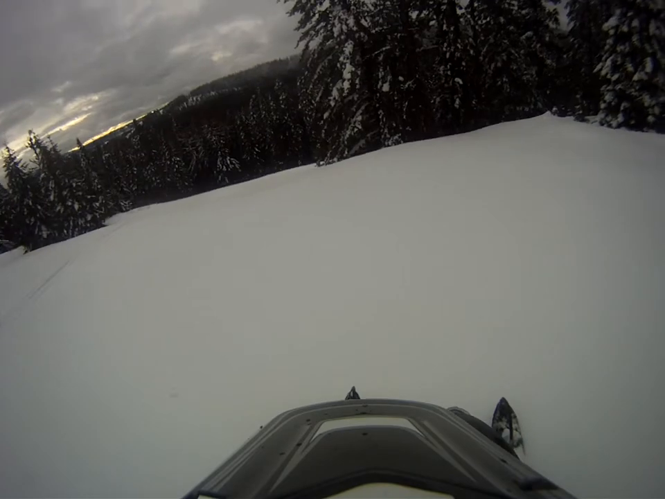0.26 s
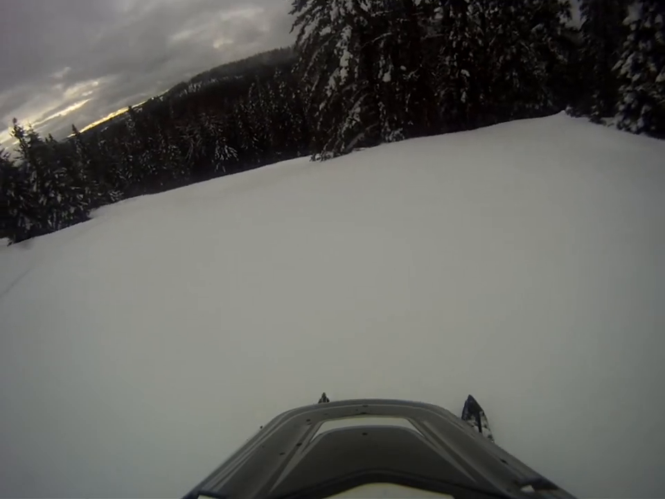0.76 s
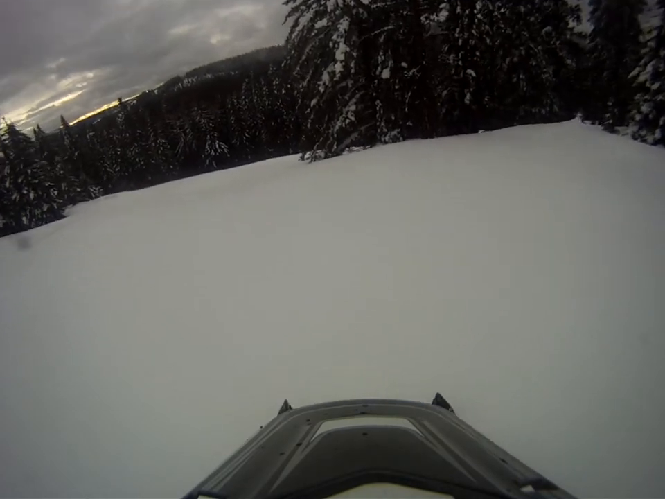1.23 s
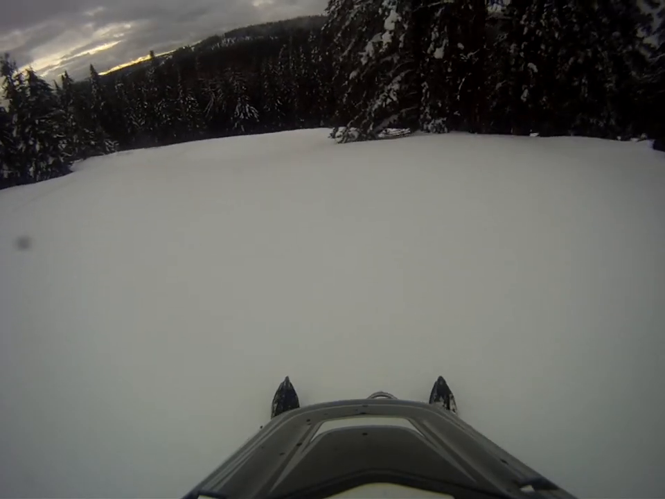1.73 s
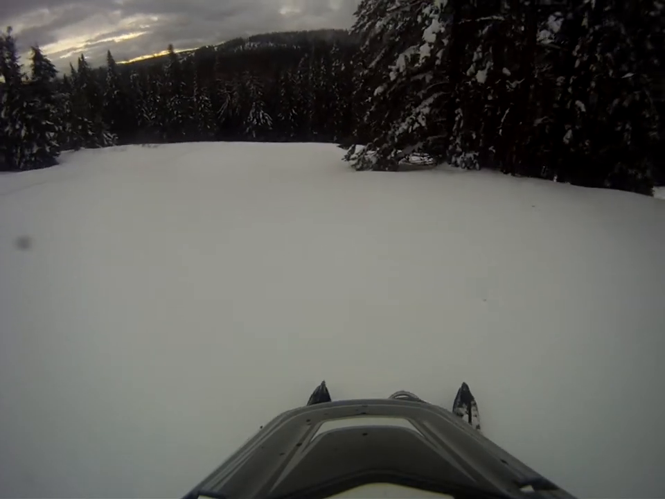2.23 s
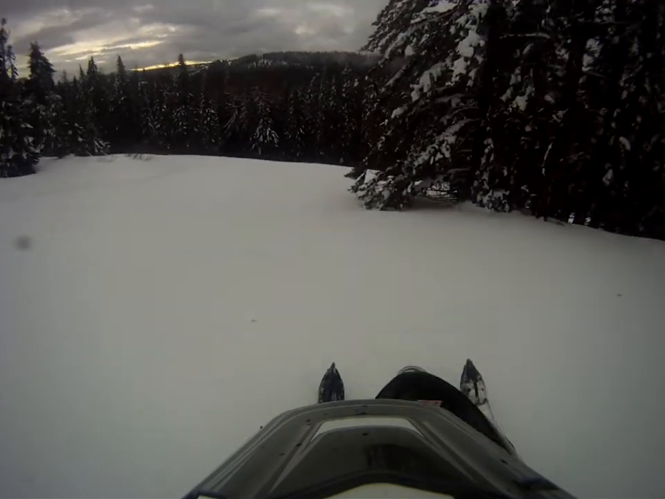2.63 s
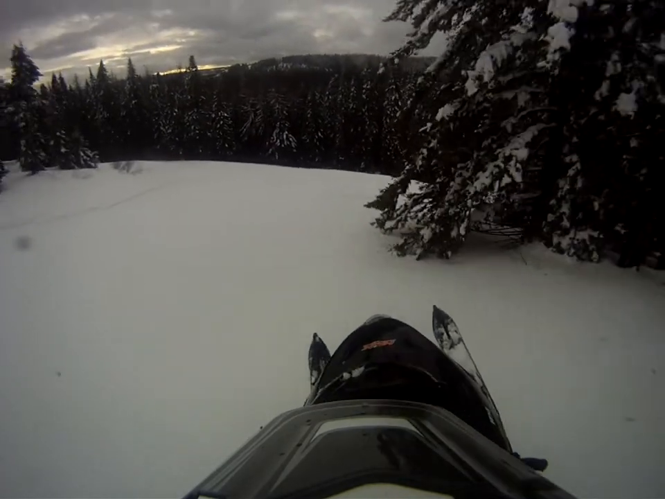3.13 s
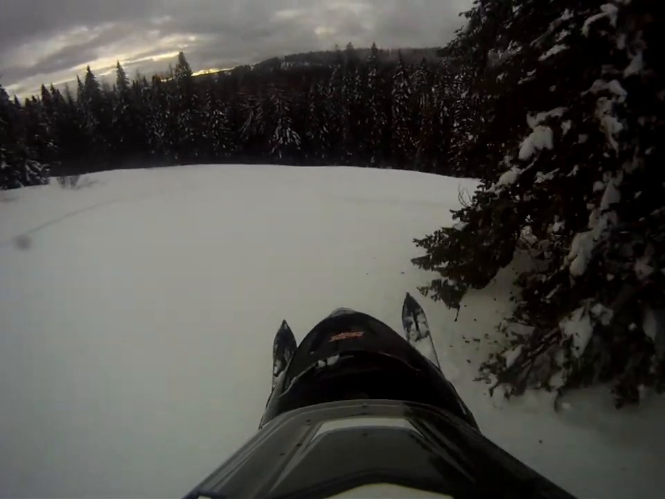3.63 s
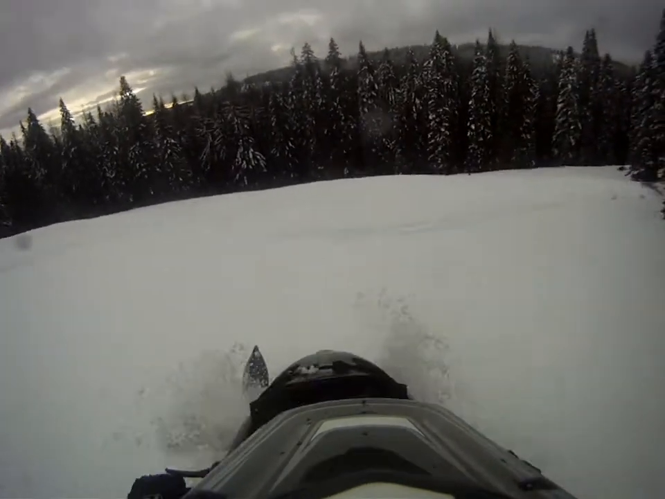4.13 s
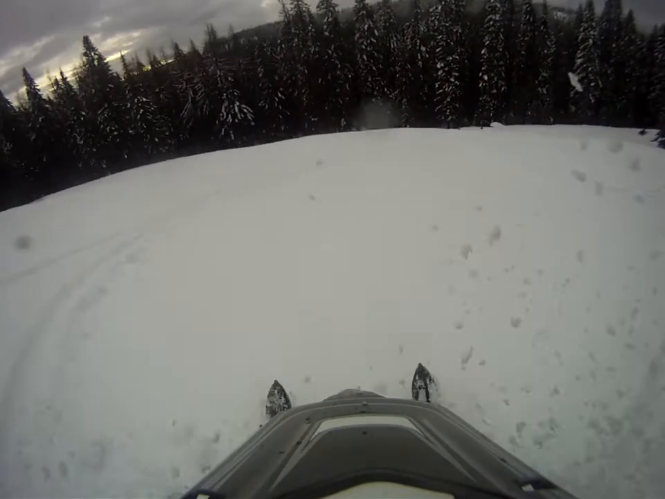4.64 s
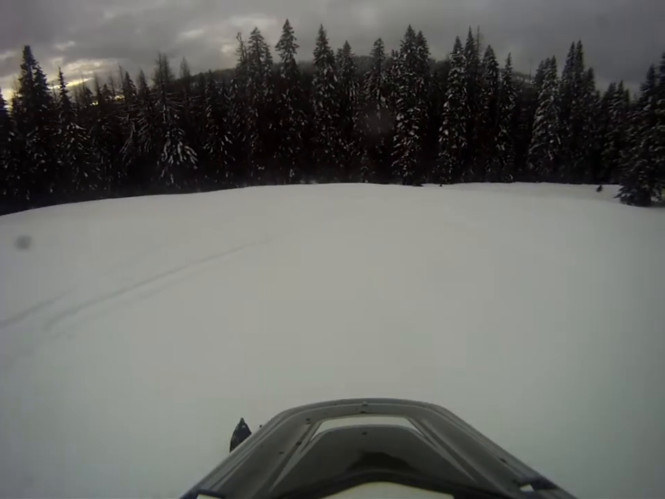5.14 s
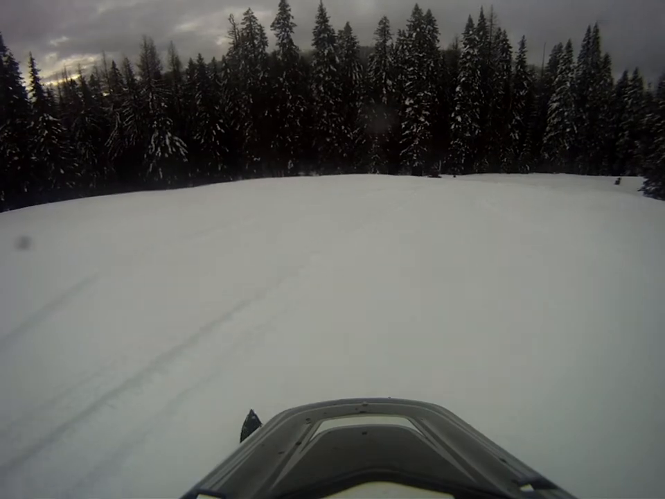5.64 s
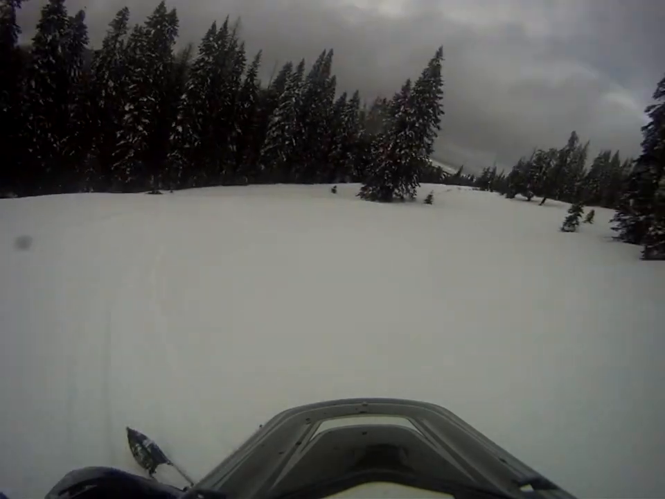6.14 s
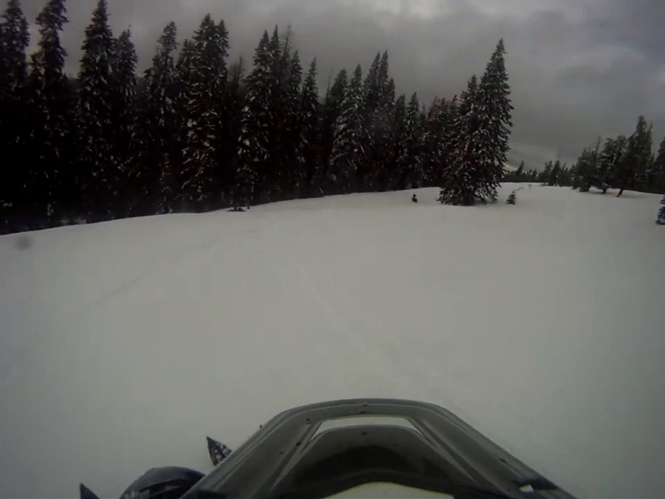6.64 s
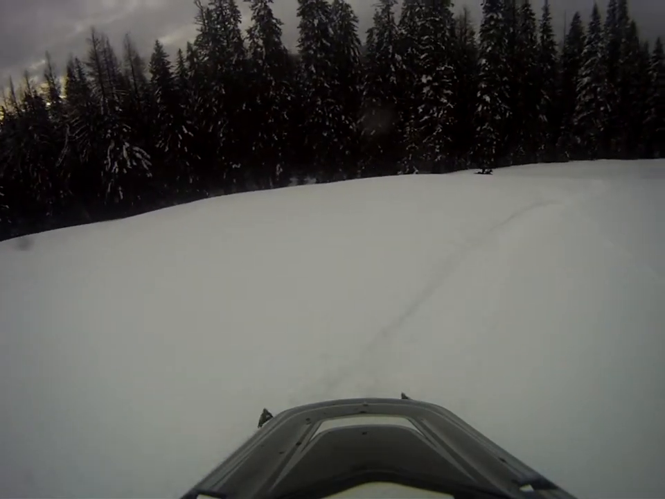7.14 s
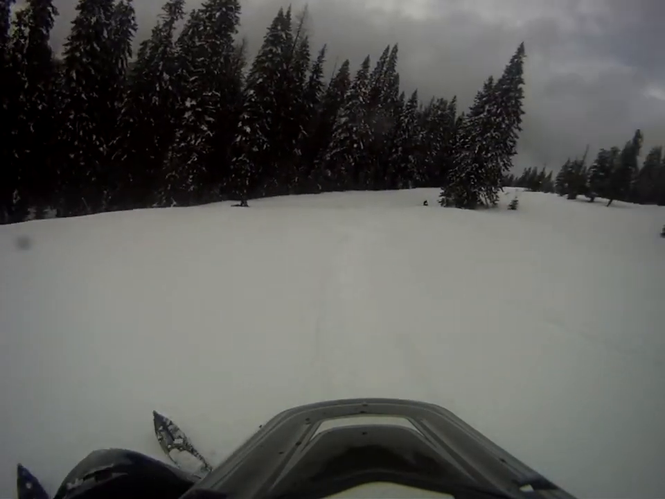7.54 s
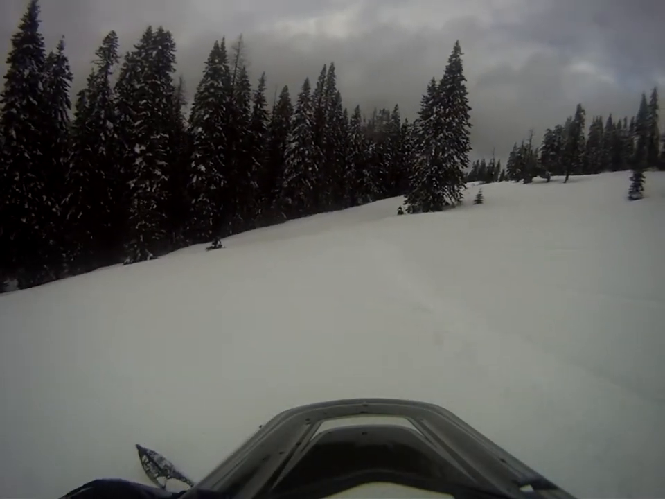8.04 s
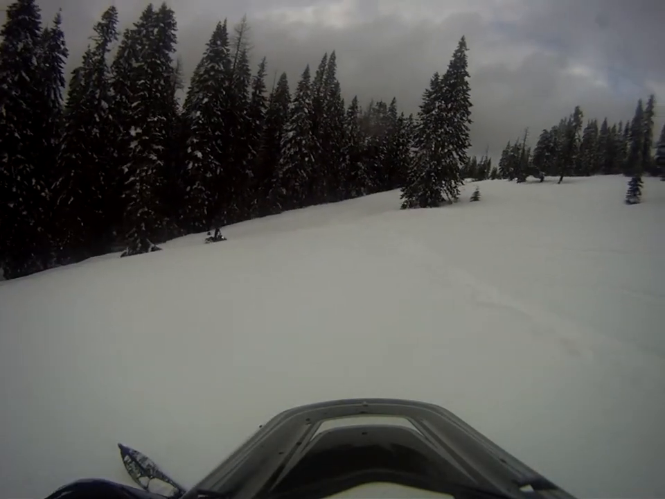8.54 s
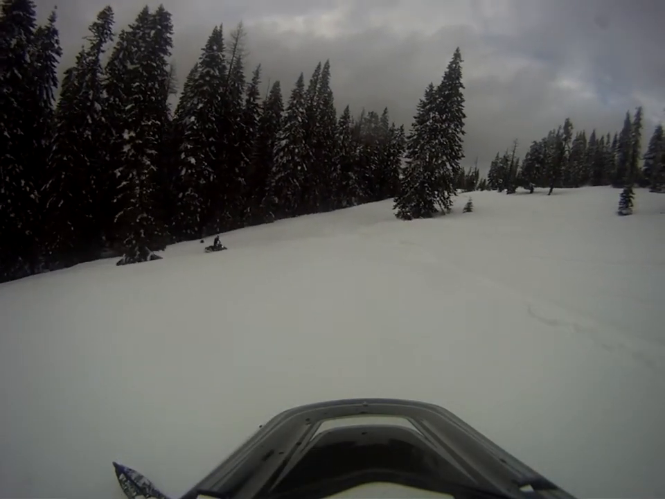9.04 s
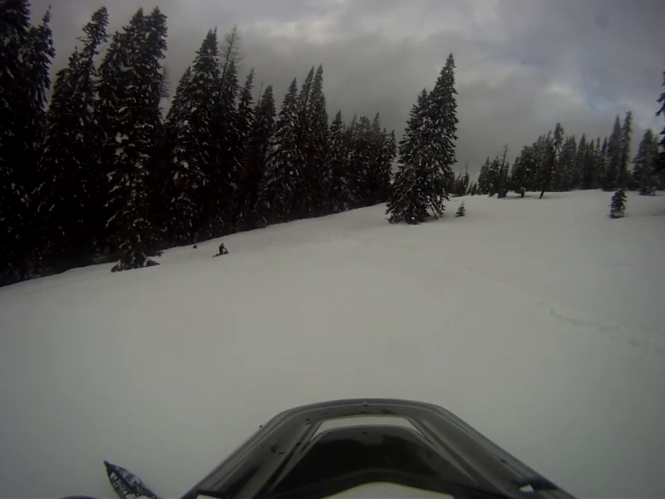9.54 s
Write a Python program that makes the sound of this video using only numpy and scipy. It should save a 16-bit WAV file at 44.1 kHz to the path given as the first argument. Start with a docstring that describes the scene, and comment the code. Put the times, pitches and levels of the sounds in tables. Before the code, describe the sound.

Outdoors in deep snow, a snowmobile engine gives two short revs, then rises to a high howl over track noise and hissing spray. As it backs off, a very loud, sharp knock hits the rider's enclosed microphone, followed by small ticks of snow and a second crack. The revs sink to an uneven, clattering idle, and another snowmobile buzzes thinly far away. The close sound is boxy and slightly gritty.

```python
"""A two-stroke twin snowmobile, heard from a camera in a closed case worn by the rider.
It blips, pulls up to full throttle through deep snow, then coasts down to a loping idle.
Firings sound the pipe and rattle the cowling; track lugs drum, powder hisses, a far sled revs.
Snow clods tick on the case and bumps set the mount humming; one hard knock overloads the
microphone and ducks its gain."""
import sys
import numpy as np
from scipy import signal
from scipy.fft import rfft, irfft, next_fast_len
from scipy.io import wavfile
from scipy.ndimage import uniform_filter1d

SR = 44100
rng = np.random.default_rng(int(sys.argv[2]) if len(sys.argv) > 2 else 0)


def waveform_to_disk(signal):
    """Save audio, clipped to [-1, 1], as 16-bit WAV at the path in sys.argv[1]."""
    frames = np.transpose(np.atleast_2d(signal))
    scaled = np.clip(frames, -1, 1) * 32767
    samples = np.round(scaled).astype(np.int16)
    wavfile.write(sys.argv[1], SR, samples)


N = 431298


def from_db(db):
    """Decibels to gain."""
    return 10 ** (np.asarray(db) / 20)


def unit_rms(x):
    """Scale to unit power."""
    return x / np.sqrt(np.mean(x ** 2) + 1e-20)


def levelled(x):
    """Hold unit power over 0.25 s."""
    return x / np.sqrt(uniform_filter1d(x ** 2, size=SR // 4) + 1e-12)


def curve(rows):
    """(t/s, value) rows at every sample."""
    return np.interp(np.arange(N) / SR, *np.transpose(rows))


def gain_at(spectrum, hz):
    """Gain from (f/Hz, level/dB) rows; -60 dB/oct beyond the ends."""
    f, db = np.transpose(spectrum)
    octave = np.log2(np.maximum(hz, 1))
    outside = np.abs(octave - np.clip(octave, np.log2(f[0]), np.log2(f[-1])))
    return from_db(np.interp(octave, np.log2(f), db) - 60 * outside)


def coloured(x, spectrum):
    """Filter by a spectrum; unit power."""
    size = next_fast_len(N + 4096)
    gain = gain_at(spectrum, np.fft.rfftfreq(size, 1 / SR))
    return unit_rms(irfft(rfft(x, size) * gain, size)[:N])


def drift(hz):
    """Slow noise below hz; unit power."""
    hop, settle = 40, 2000
    r = np.exp(-2 * np.pi * hz * hop / SR)
    slow = signal.lfilter([1], [1, -2 * r, r * r], rng.standard_normal(N // hop + settle + 2))[settle:]
    return np.interp(np.arange(N) / hop, np.arange(len(slow)), unit_rms(slow))


def smooth(x, lag_s):
    """One-pole lag."""
    r = np.exp(-1 / (lag_s * SR))
    return signal.lfilter([1 - r], [1, -r], x + 1e-18)


def resonance(x, hz, width_hz):
    """Two-pole band-pass, unit peak gain."""
    r = np.exp(-np.pi * width_hz / SR)
    feedback = [1, -2 * r * np.cos(2 * np.pi * hz / SR), r * r]
    return signal.lfilter(np.array([1, 0, -1]) * (1 - r * r) / 2, feedback, x)


def partial(turns, order, flutter_db, wander_rad):
    """One order, unsteady in level and phase."""
    gain = np.sqrt(2) * from_db(flutter_db * drift(8.7))
    return gain * np.sin(2 * np.pi * (order * turns + rng.random()) + wander_rad * drift(27))


def buzz(cycles, orders, spectrum, flutter_db, jitter_cycles, groups):
    """One rattle per cycle from interpolated (order, level/dB) rows; orders waver in groups."""
    size = 4096
    multiples, level_db = np.transpose(orders)
    k, out = np.arange(size // 2 + 1), 0
    gains = from_db(np.interp(k, multiples, level_db, left=-200, right=-200))
    lines = gains * np.exp(2j * np.pi * rng.random(len(k)))
    for group in range(groups):
        one_cycle = irfft(lines * (k % groups == group))
        phase = (cycles + jitter_cycles * drift(33)) % 1
        wave = np.interp(phase * size, np.arange(size), one_cycle)
        out = out + from_db(flutter_db * drift(19.5)) * wave
    return levelled(coloured(out, spectrum))


def follows(law_db, state):
    """Gain whose dB are linear in each row of engine_state or track_state."""
    return from_db(np.dot(law_db, state))


# far engine: t/s, firing rate/Hz, level/dB
FAR_RUN = [(7.9, 107, -75), (8.25, 120, -53.5), (8.55, 128, -52), (8.9, 130, -52.5), (9.15, 120, -50),
           (9.3, 143, -46.5), (9.53, 157, -46), (9.78, 153, -47)]
# its revs: t/s, level/dB
FAR_REVS = [(8.3, -53.5), (9.28, -51.5)]
# its note and rasp spectra: f/Hz, level/dB
FAR_NOTE = [(430, -16), (800, -13), (1050, -1), (1400, -7), (1900, 3.5), (2500, -3.5), (3100, -15),
            (3500, -5), (4400, -14.5), (5400, -18.5)]
FAR_RASP = [(1900, -10), (2500, 2), (3100, -10), (3500, 8), (4300, -13), (5100, -1), (5500, 2), (5900, -29)]

def far_sled(swell_s=0.27):
    """A second engine, thin with distance, rasping at each rev."""
    times, firing_hz, level_db = np.transpose(FAR_RUN)
    t = np.arange(N) / SR
    cycles = np.cumsum(np.interp(t, times, firing_hz)) / SR
    revs = sum(from_db(db) / np.cosh(2 * (t - s) / swell_s) for s, db in FAR_REVS)
    orders = [(3, 0), (52, 0)]
    note = buzz(cycles, orders, FAR_NOTE, flutter_db=3.5, jitter_cycles=0.006, groups=5)
    rasp = buzz(cycles, orders, FAR_RASP, flutter_db=4, jitter_cycles=0.007, groups=5)
    return from_db(np.interp(t, times, level_db)) * note + revs * rasp


# chassis jolts: t/s, level/dB, tilt/(dB/oct)
JOLTS = [(0.141, -45, -13), (2.08, -54, -4), (3.168, -40, -6), (4.107, -18, -8), (4.129, -20, -14),
         (4.56, -34, 0), (4.721, -27, 6.5), (4.871, -36, 2), (5.25, -36, -7), (6.14, -37, 3.5),
         (6.722, -36, -16), (6.797, -21, 3.5), (7.565, -39, 5.5), (7.685, -38, 2), (7.88, -44, -4)]
# camera mount modes: f/Hz, level/dB, t60/s
MOUNT_MODES = [(57.3, 0.5, 0.62), (149, -2, 0.053), (284, -13.5, 0.056), (389, -20, 0.085),
               (755, -22.5, 0.045)]

def bumps(attack_s=0.0069):
    """Jolts ring the mount low; hard ones wake its upper modes."""
    out, t = np.zeros(N), np.arange(SR) / SR
    rings = [from_db(db - 60 * t / t60) * np.sin(2 * np.pi * hz * t) for hz, db, t60 in MOUNT_MODES]
    octaves = np.log2(np.array(MOUNT_MODES)[:, 0] / MOUNT_MODES[0][0])
    attack = 1 - np.exp(-t / attack_s)
    for s, db, tilt in JOLTS:
        start = round(s * SR)
        out[start:start + len(t)] += attack * np.dot(from_db(db + tilt * octaves), rings)
    return out


# air buffet spectrum: f/Hz, level/dB
AIR_BUFFET = [(12, 6), (30, 5), (55, -26), (90, 9), (180, -27), (400, -64)]

def shake(running):
    """Snow and air shake the camera; the mount hums in its lowest mode."""
    air = coloured(rng.standard_normal(N), AIR_BUFFET)
    hum = unit_rms(resonance(rng.standard_normal(N), MOUNT_MODES[0][0], width_hz=4.8))
    return follows((-52, 4.5), running) * (from_db(-0.5) * air + hum)


# knocks and snow clods: t/s, peak/dB, t60/s, tilt/(dB/oct)
CASE_HITS = [(0.026, -26.5, 0.056, -7), (4.1406, 43.5, 0.014, 1.5), (4.357, -12.5, 0.0088, 10),
             (4.3695, -3, 0.0059, 23), (4.38, -7, 0.011, 8), (4.401, -14.5, 0.0054, -29),
             (4.412, -11, .012, 9), (4.6376, -2, 0.014, -9.5), (4.7185, 22.5, 0.0061, 4),
             (4.7244, 0.5, 0.015, 7), (4.743, -13, 0.04, 12), (4.7535, -7, 0.011, 5),
             (6.812, -25.5, 0.051, -17), (7.599, -26.5, 0.04, -1), (7.649, -30, 0.04, -19)]
# case modes: f/Hz, width/Hz, level/dB
CASE_MODES = [(790, 1200, -31.5), (1274, 98, -1), (1856, 590, 5.5), (2300, 610, 6.5), (3594, 230, -1),
              (4840, 320, -9)]

def knocks():
    """Each contact is a short crunch that rings the plastic case; heavy ones thud as well."""
    out, t = np.zeros(N), np.arange(SR // 10) / SR
    pivot_hz = CASE_MODES[2][0]
    for s, peak_db, t60, tilt in CASE_HITS:
        crunch = rng.standard_normal(len(t)) * from_db(-60 * t / t60)
        ring = sum((-1) ** k * from_db(db + tilt * np.log2(hz / pivot_hz)) * resonance(crunch, hz, width)
                   for k, (hz, width, db) in enumerate(CASE_MODES))
        thud = from_db(-16 + 0.27 * peak_db) * resonance(crunch, hz=317, width_hz=260)
        hit = ring + thud
        start = round(s * SR)
        out[start:start + len(t)] += from_db(peak_db) * hit / np.abs(hit).max()
    return out


# track speed: t/s, lug rate/Hz
LUG_RATE = [(0, 45), (2.1, 70), (2.5, 105), (3, 200), (3.3, 275), (3.9, 330), (4.7, 445), (5.05, 390),
            (6, 302), (6.35, 235), (6.8, 205), (7.5, 170), (8, 45)]

def track_state(cruise_hz=300):
    """Lug rate, and the rows a track law weights: 1, octaves above cruise."""
    lug_hz = curve(LUG_RATE)
    return lug_hz, np.array([np.ones(N), np.log2(lug_hz / cruise_hz)])


# snow swish spectrum: f/Hz, level/dB
LUG_SWISH = [(450, -6), (750, 14), (950, 9.5)]

def track(lug_hz, running, throttle, dig_db=18):
    """Lugs drum over the drive wheels and swish through snow, biting harder with throttle."""
    drumming = partial(np.cumsum(lug_hz) / SR, order=0.94, flutter_db=4.5, wander_rad=0.26)
    swish = coloured(rng.standard_normal(N), LUG_SWISH)
    gain = follows((-58.5, 11.5), running) * from_db(dig_db * throttle)
    return gain * (from_db(-3) * drumming + from_db(3.5) * swish)


# powder past the skis and over the hood: t/s, level/dB
POWDER_SPRAY = [(2.4, -77), (3.7, -28), (4.5, -33), (4.72, -41), (4.95, -84)]
# hiss spectrum: f/Hz, level/dB
HISS_SPECTRUM = [(1710, -0.5), (2900, -4), (3150, -10), (3360, 2.5), (3600, 0.5), (4480, -16),
                 (5030, -12.5), (5470, -7.5), (5800, -26.5), (7540, -44), (12800, -120)]

def hiss(rattle, engine, running):
    """Engine hiss, rushing snow and spray add in power."""
    snow = np.hypot(follows((-44, 16.5), running), from_db(curve(POWDER_SPRAY)))
    gain = np.hypot(follows((-49.5, 8.5, -1.5, 15, -2.5), engine), snow)
    return gain * coloured(rattle, HISS_SPECTRUM)


# pops around the blips: t/s, level/dB, f/Hz
EXHAUST_POPS = [(0.329, -31, 93.5), (0.662, -36, 86), (0.851, -33, 93.5), (1.02, -29, 105),
                (1.062, -45, 110), (1.209, -42, 85), (1.308, -35, 95)]

def pops(decay_s=0.017):
    """Late burns thump in the muffler."""
    out, t = np.zeros(N), np.arange(SR // 4) / SR
    for s, db, hz in EXHAUST_POPS:
        start = round(s * SR)
        out[start:start + len(t)] += from_db(db) * np.sin(2 * np.pi * hz * t) * np.exp(-t / decay_s)
    return out


# growl under load: t/s, level/dB
INTAKE_GROWL = [(1.3, -45), (1.9, -37.5), (2.42, -29.5), (2.56, -28.5), (2.85, -24), (3.05, -36),
                (3.45, -30)]
# airbox spectrum: f/Hz, level/dB
AIRBOX_SPECTRUM = [(850, -32), (960, -3), (1100, 4), (1280, 3), (1450, -21), (2000, -5.5), (2330, -11.5),
                   (2600, -17)]

def intake(turns, burning):
    """Gulps of air ring the airbox while fuel burns."""
    orders = [(6, 0), (32, 0)]
    growl = buzz(turns, orders, AIRBOX_SPECTRUM, flutter_db=4, jitter_cycles=0.00067, groups=3)
    return burning * from_db(curve(INTAKE_GROWL)) * growl


# successive firings of one idle lope: level/dB
LOPE = [-3, 3, 2, 3.5, -4, 2.5]

def firings(turns, idle):
    """Two clicks per turn; strong and weak ones at idle."""
    number = np.floor(2 * turns).astype(int)
    lope_db = np.array(LOPE)[number % len(LOPE)]
    return np.diff(number, prepend=0) * from_db(idle * lope_db)


def piston_slap(lopes, idle, level_db=-59.5, hz=1291, width_hz=160):
    """A short piston knock marks each idle lope."""
    strikes = np.diff(np.floor(lopes), prepend=0)
    bursts = smooth(strikes, lag_s=0.028) * rng.standard_normal(N)
    knock = resonance(bursts, hz, width_hz)
    return from_db(level_db) * idle * levelled(resonance(knock, hz, 2 * width_hz))


# gas puff spectrum: f/Hz, level/dB
PUFF_SPECTRUM = [(24, -44.5), (40, -0.5), (113, -4), (187, -11), (206, -12.5), (233, -9), (272, -12),
                 (299, -9.5), (341, -10.5), (471, -12.5), (700, -30), (910, -68), (1540, -120)]

def puffs(clicks, engine, running):
    """Ragged gas puffs leave the muffler; tunnel rumble adds to them with track speed."""
    gas = levelled(smooth(clicks, lag_s=0.012)) * rng.standard_normal(N)
    gain = np.hypot(follows((-50, 2.5, -3, 5.5, 5.5), engine), follows((-53.5, 16), running))
    return gain * coloured(0.5 * levelled(clicks) + 1.33 * gas, PUFF_SPECTRUM)


def firing_rattle(clicks, idle):
    """Noise that swells at each firing."""
    bursts = (1 - 0.24 * idle) * levelled(smooth(clicks, lag_s=0.029))
    flutter = from_db(0.97 * drift(21.6))
    return levelled((2.6 + bursts) * flutter * rng.standard_normal(N))


# clatter spectra by engine speed: f/Hz, level/dB
CLATTER_IDLE = [(380, -57), (650, -33), (751, 3), (855, -24.5), (890, -8.5), (962, 7.5), (1130, -0.5),
                (1330, 12), (1450, 2.5), (1600, -3), (2030, 2), (2120, 1), (2760, -13), (2980, -72),
                (3100, -48.5), (4030, -84), (6820, -120)]
CLATTER_LOADED = [(380, -20), (650, -17), (698, -25), (760, -4.5), (844, -27), (919, -2.5), (988, -2),
                  (1130, 3), (1310, 6), (1570, -2), (1740, -1.5), (2360, -1), (2670, -20.5), (3100, -63),
                  (4030, -53), (6820, -120)]
CLATTER_RACING = [(380, -51), (650, -9.5), (791, -35), (861, -36), (943, 4), (1260, 1.5), (1450, 6),
                  (1610, -3), (2280, -2.5), (2830, -21), (3100, -34.5), (4030, -59), (6820, -120)]

def clatter(rattle, lopes, idle, racing, throttle, engine, running):
    """Pistons, clutch and chain under the cowling: chugging at idle, flaring as the throttle opens."""
    chug = from_db(7 * np.cos(2 * np.pi * lopes))
    blend = [(idle * chug, CLATTER_IDLE), (racing, CLATTER_RACING), (1 - idle - racing, CLATTER_LOADED)]
    body = sum(np.sqrt(np.maximum(share, 0)) * coloured(rattle, spectrum) for share, spectrum in blend)
    gain = np.hypot(follows((-37, 12, -4, 2, -2), engine), follows((-44.5, 14.5), running))
    flare_db = 25 * np.maximum(throttle - smooth(throttle, lag_s=0.13), 0)
    return gain * from_db(flare_db) * levelled(body)


# high firing harmonics: f/Hz, level/dB
SCREAM_SPECTRUM = [(1900, -10), (2200, 7.5), (2480, -16), (2760, -6), (3050, -26.5), (3600, 7), (4400, -12),
                   (5400, -22)]

def scream(turns, engine):
    """On the pipe the firings sharpen and their high harmonics ring clear."""
    orders = [(7, 0), (20, 0)]
    harmonics = buzz(2 * turns, orders, SCREAM_SPECTRUM, flutter_db=2, jitter_cycles=0.0015, groups=3)
    return follows((-54.5, 10.5, -0.5, 11, 4), engine) * harmonics


# howl: crank order, level/dB
HOWL_ORDERS = [(6, -16), (7, -16), (8, -6), (9, -11.5), (10, -8), (11, -4), (12, 4.5), (13, -10.5),
               (14, -3.5), (15, 0.5), (16, 1), (17, 2), (18, 0), (19, -3.5), (20, 9), (21, -8), (22, 6),
               (30, -12.5), (42, -2.5), (60, -7)]
# cowling response: f/Hz, level/dB
COWLING = [(650, -43), (870, -28), (980, 1), (1300, 8.5), (1480, 0), (1630, 2), (1800, 3), (2200, -1.5),
           (2750, -17.5), (3100, -44), (3550, -10), (4400, -16), (5400, -17)]

def howl(turns, engine):
    """Upper crank orders sound through the cowling."""
    tone = buzz(turns, HOWL_ORDERS, COWLING, flutter_db=1.6, jitter_cycles=0.0012, groups=5)
    return follows((-42, 13, 1, 5.5, 3), engine) * tone


# weaker exhaust partials: crank order, level/dB
WEAK_ORDERS = [(1, -9.5), (3, -15.5), (5, -23.5), (6, -7), (8, -13)]
# pipe and muffler responses: f/Hz, level/dB
PIPE_RESPONSE = [(40, -13), (110, -3.5), (152, -2.5), (195, -0.5), (250, -9.5), (280, -5.5), (400, -0.5),
                 (520, 2), (650, -5.5), (820, -6.5), (1100, -35)]
MUFFLER_RESPONSE = [(110, -1), (250, -1), (295, 1.5), (370, -7), (480, -7.5), (560, 7)]

def exhaust(crank_hz, turns, engine):
    """Two firings per turn give the even orders; unequal cylinders add the odd ones."""
    note = gain_at(PIPE_RESPONSE, 2 * crank_hz) * partial(turns, 2, flutter_db=1.5, wander_rad=0.077)
    octave = gain_at(MUFFLER_RESPONSE, 4 * crank_hz) * partial(turns, 4, flutter_db=1.5, wander_rad=0.08)
    weak = sum(from_db(db) * gain_at(PIPE_RESPONSE, k * crank_hz)
               * partial(turns, k, flutter_db=1.5, wander_rad=0.12) for k, db in WEAK_ORDERS)
    return (follows((-49, 2, 8, 10.5, 0.5), engine) * note
            + follows((-61, -2.5, 11.5, 7.5, 16.5), engine) * octave
            + follows((-51.5, 4.5, 8.5, 3, 1.5), engine) * weak)


# two blips, climb, full throttle, coast to idle: t/s, firing rate/Hz
FIRING_RATE = [(0, 121), (.3, 97), (.5, 146), (.61, 163), (.78, 134), (1, 122), (1.2, 143), (1.32, 137.5),
               (2, 175), (2.44, 194.5), (2.62, 243), (2.84, 273), (3.3, 277), (3.65, 269), (3.85, 266),
               (4.1, 197), (4.3, 165), (4.55, 159), (5, 130), (5.35, 106), (5.85, 85), (6.42, 60),
               (9.78, 61.5)]
# throttle squeezes: open/s, shut/s, first opening (0-1), last opening (0-1)
SQUEEZES = [(0.3, 0.558, 0, 0.54), (0.985, 1.173, 0.04, 0), (1.322, 2.51, 0.03, 0.09),
            (2.475, 3.876, 0.47, 0.85)]

def engine_state(cruise_hz=135, throttle_lag_s=0.043, pipe_lag_s=0.079, on_pipe_hz=(233, 272)):
    """Firing rate, and the rows an engine law weights: 1, octaves above cruise, burn, throttle, pipe."""
    firing_hz, t = curve(FIRING_RATE), np.arange(N) / SR
    thumb = sum(np.interp(t, [opens, shuts], [first, last], left=0, right=0)
                for opens, shuts, first, last in SQUEEZES)
    burning = smooth(1.0 * (thumb != 0), throttle_lag_s)
    burning = np.maximum(burning, smooth(burning, lag_s=0.15))  # runs on with crankcase fuel
    throttle = smooth(np.clip(thumb, 0, 1), throttle_lag_s)
    on_pipe = throttle * smooth(np.interp(firing_hz, on_pipe_hz, [0, 1]), pipe_lag_s)  # pipe resonates
    return firing_hz, np.array([np.ones(N), np.log2(firing_hz / cruise_hz), burning, throttle, on_pipe])


def scene():
    """Crank speed and throttle drive the engine; track speed drives the running noise."""
    firing_hz, engine = engine_state()
    burning, throttle = engine[2:4]
    lug_hz, running = track_state()
    crank_hz = uniform_filter1d(firing_hz, size=SR // 20) / 2 * (1 + 0.00083 * drift(8.7))
    turns = np.cumsum(crank_hz) / SR
    lopes = 2 * turns / len(LOPE)
    idle = np.interp(firing_hz, [64, 90], [1, 0])
    racing = np.interp(firing_hz, [195, 255], [0, 1])
    clicks = firings(turns, idle)
    rattle = firing_rattle(clicks, idle)
    mix = far_sled() + bumps() + shake(running) + knocks()
    mix += track(lug_hz, running, throttle) + hiss(rattle, engine, running)
    mix += pops() + intake(turns, burning) + piston_slap(lopes, idle) + puffs(clicks, engine, running)
    mix += clatter(rattle, lopes, idle, racing, throttle, engine, running)
    mix += scream(turns, engine) + howl(turns, engine) + exhaust(crank_hz, turns, engine)
    return mix[None]


def gain_control(x, threshold_db=15, release_db_per_s=152, attack_s=0.0047):
    """Loud peaks pull the gain down; it climbs back steadily."""
    over_db = np.maximum(20 * np.log10(np.abs(x) + 1e-9) - threshold_db, 0)
    ramp_db = release_db_per_s * np.arange(N) / SR
    duck_db = np.maximum.accumulate(over_db + ramp_db) - ramp_db
    return x * from_db(-smooth(duck_db, attack_s))


def record(dry):
    """Gain control, overload, and a slow converter whose held steps mirror the sound into gritty treble."""
    converter_hz, cutoff_hz, hold = 12000, 15200, 4
    clipped = np.clip(gain_control(dry[0]), -1, 1)
    steps = np.repeat(signal.resample_poly(clipped, converter_hz, SR, window=("kaiser", 3)), hold)
    gritty = signal.resample_poly(steps, SR, hold * converter_hz)[:N]
    lowpass = signal.ellip(10, 0.1, 80, cutoff_hz, fs=SR, output="sos")
    return signal.sosfilt(lowpass, gritty)[None]


dry = scene()
out = record(dry)
waveform_to_disk(out)
```